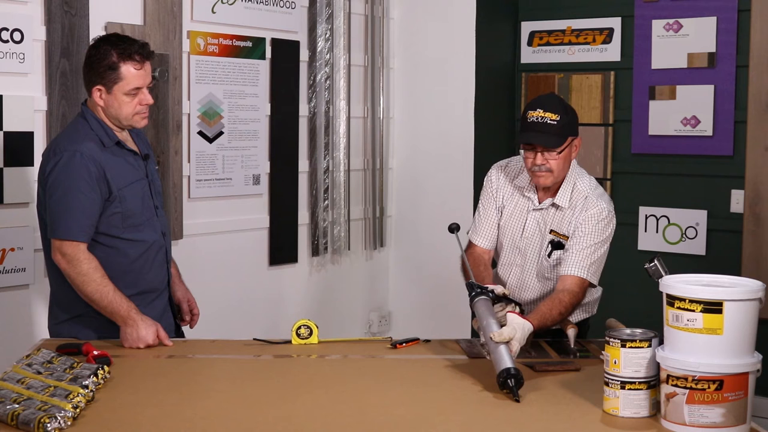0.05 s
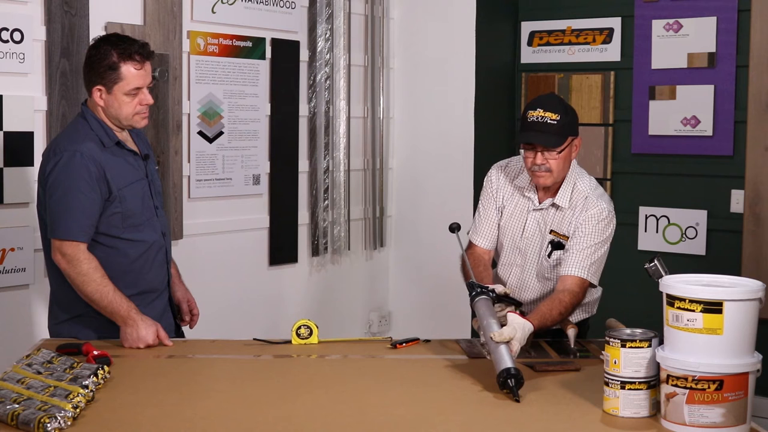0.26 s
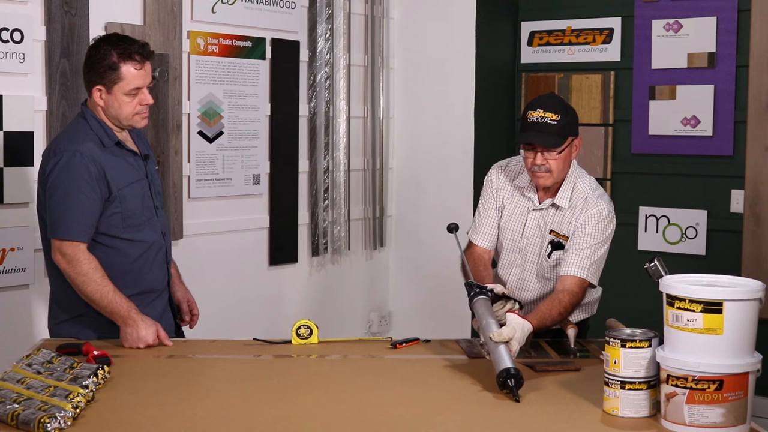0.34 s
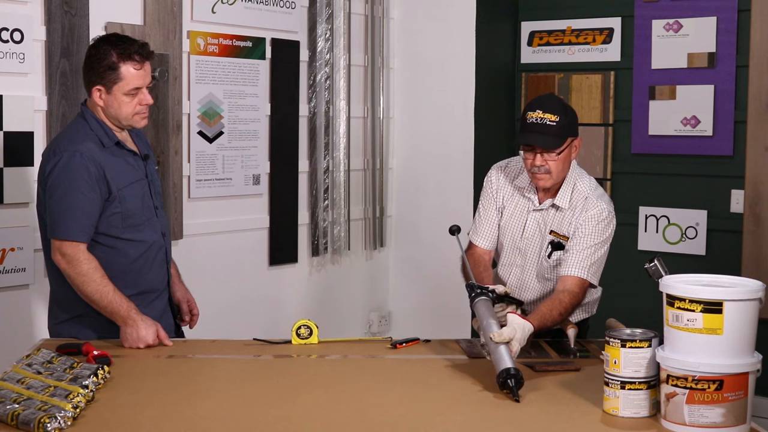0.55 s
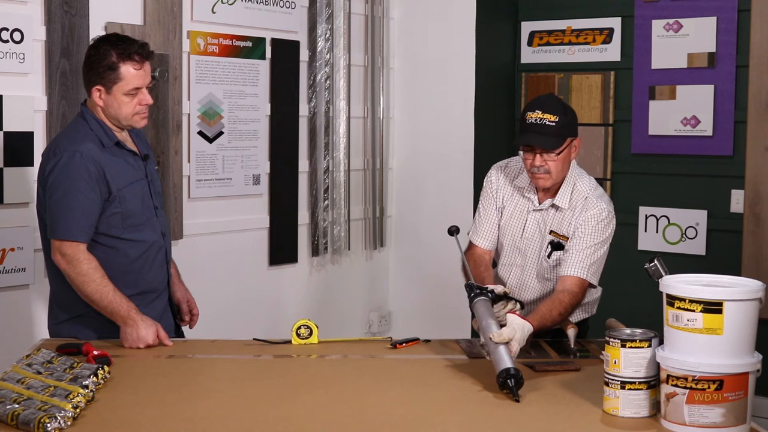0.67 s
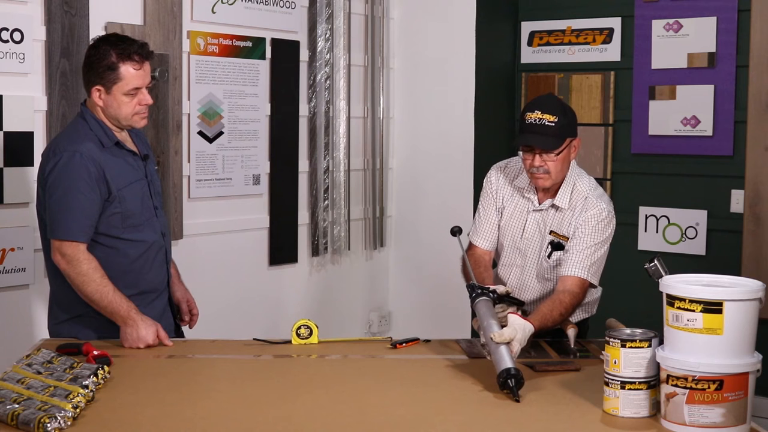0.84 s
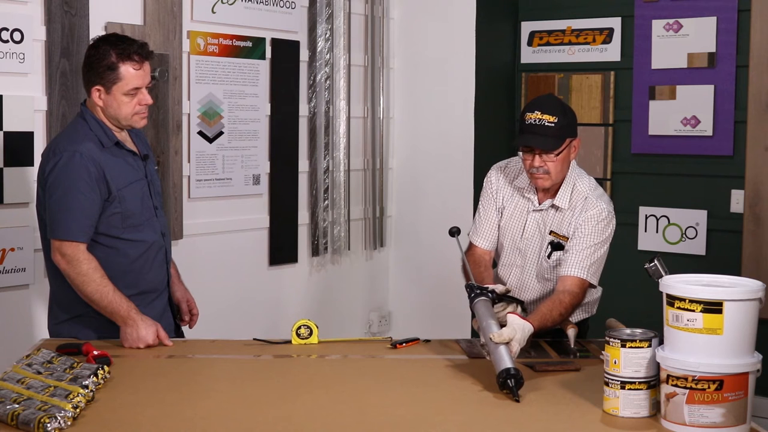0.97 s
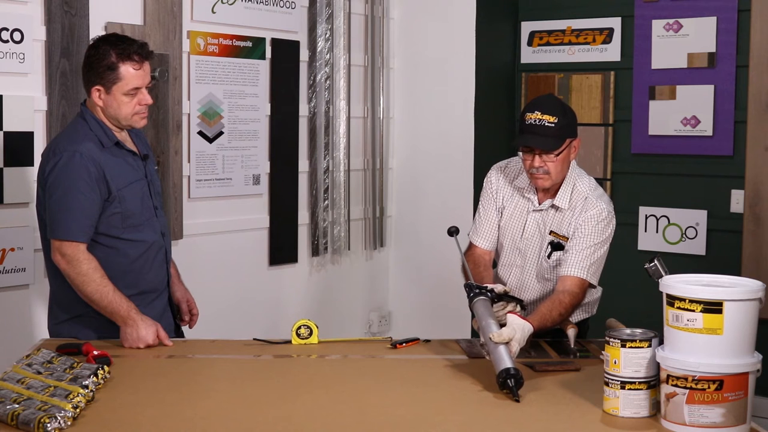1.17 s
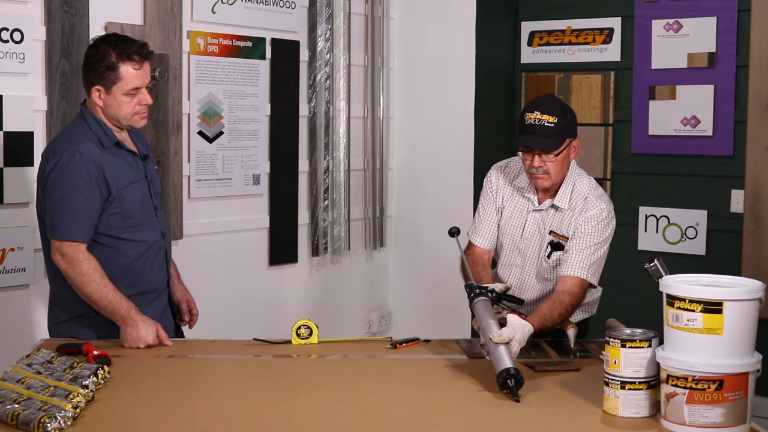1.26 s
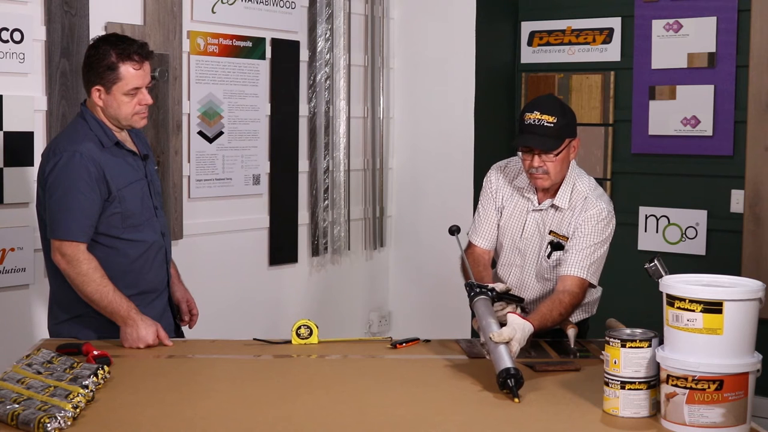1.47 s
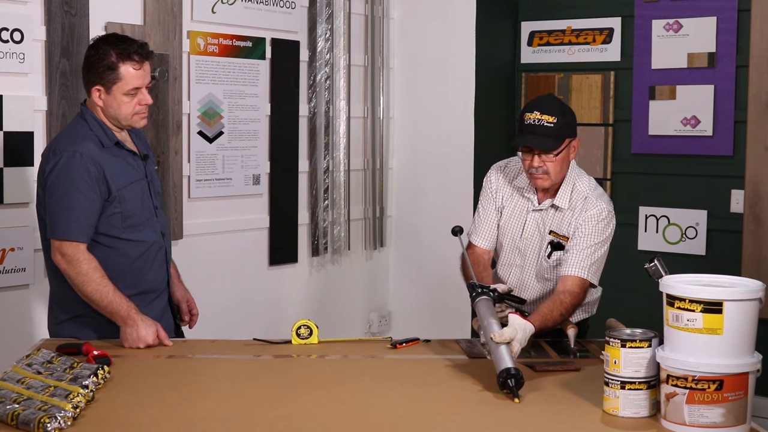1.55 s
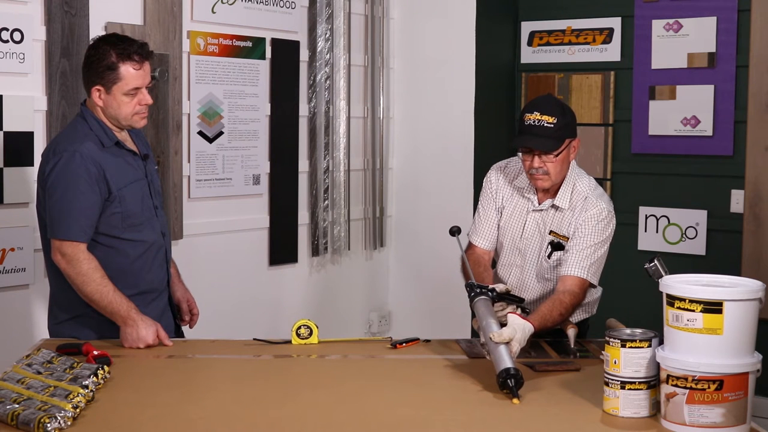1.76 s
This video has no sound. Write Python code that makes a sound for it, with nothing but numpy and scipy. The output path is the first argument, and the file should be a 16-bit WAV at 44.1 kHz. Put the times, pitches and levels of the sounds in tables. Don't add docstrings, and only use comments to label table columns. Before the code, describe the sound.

A metal caulking gun is pumped about six times in quick rhythm, each pull creaking and clacking, each release squeaking and scraping; one very loud snap, then a weaker one, in a reverberant room with faint ventilation rumble.

```python
import sys
import numpy as np
from scipy import signal
from scipy.fft import rfft, irfft
from scipy.io import wavfile

SR = 44100
rng = np.random.default_rng(int(sys.argv[2]) if len(sys.argv) > 2 else 0)


def attenuation_scalar(level_db):
    decades = np.asarray(level_db, float) / 20
    return 10 ** decades


def unload_wav(signal):
    wavfile.write(
        sys.argv[1],
        SR,
        np.round(np.clip(np.atleast_2d(signal).T, -1, 1) * 32767).astype(np.int16),
    )


N = 79380
T = np.arange(N) / SR
KNOCK_ECHO_SHARE = 0.2


def at_hz(points, hz):
    p = np.array(points)
    return np.interp(np.log(np.maximum(hz, 1)), np.log(p[:, 0]), p[:, 1])


def rms_one(x):
    return x / np.sqrt(np.mean(x ** 2) + 1e-20)


def colour(x, points):
    return irfft(rfft(x) * attenuation_scalar(at_hz(points, np.fft.rfftfreq(N, 1 / SR))), N)


def drift(rate_hz):
    r = np.exp(-2 * np.pi * rate_hz / SR)
    wander = signal.lfilter([1], [1, -2 * r, r * r], rng.standard_normal(N + SR))
    return rms_one(wander[SR:])


def ring(x, hz, t60_s):
    r = attenuation_scalar(-60 / (t60_s * SR))
    w = 2 * np.pi * hz / SR
    return signal.lfilter([0, np.sin(w)], [1, -2 * r * np.cos(w), r * r], x + 1e-18)


def peak(x, hz, width_hz):
    r = np.exp(-np.pi * width_hz / SR)
    feedback = [1, -2 * r * np.cos(2 * np.pi * hz / SR), r * r]
    return signal.lfilter([(1 - r * r) / 2, 0, (r * r - 1) / 2], feedback, x + 1e-18)


def swell(s, half):
    return np.cos(np.pi / 2 * np.clip((T - s) / half, -1, 1)) ** 2


def surge(s, half):
    return swell(s, half) * np.clip(1 + (T - s) / half, 0, 2)


def burst(s, tau):
    return (T >= s) * np.exp(-np.maximum(T - s, 0) / tau)


def thud(s, rise):
    x = np.maximum(T - s, 0) / rise
    return x * np.exp(1 - x)


def even(x):
    return rms_one(x / (np.abs(signal.hilbert(x)) + 0.3 * x.std()) ** 0.7)


def squeals():
    # centre_s, half_width_s, peak_db, pitch_hz
    squeal_table = [(0.060, 0.0094, -30, 3448), (0.076, 0.011, -31, 3451), (0.087, 0.0078, -43.5, 3590),
                    (.358, 0.0088, -25, 3439), (0.366, 0.0026, -31, 3485), (.37, 0.0034, -30.5, 3495),
                    (0.373, 0.002, -36, 3904), (.639, 0.011, -30, 3417), (.649, 0.007, -29.5, 3500),
                    (0.657, 0.0018, -43, 4144), (.922, 0.0085, -34, 3386), (.931, 0.0049, -33, 3437),
                    (0.936, 0.007, -44, 3484), (.942, 0.0031, -30.5, 3740), (1.169, 0.0087, -44.5, 3500),
                    (1.176, 0.0065, -34, 3445), (1.185, 0.004, -39.5, 3500), (1.196, 0.013, -39.5, 3530),
                    (1.212, .01, -52.5, 3593), (1.423, 0.0088, -52, 3438), (1.433, 0.0093, -36, 3500),
                    (1.442, 0.0055, -45, 3610), (1.454, 0.014, -50, 3575)]
    overtone_levels = [-24, -24, -32]
    swells = np.array([attenuation_scalar(db) * swell(s, half) for s, half, db, hz in squeal_table]) + 1e-12
    pitch = np.array(squeal_table)[:, 3] @ swells / swells.sum(axis=0)
    phase = 2 * np.pi * np.cumsum(pitch * (1 + 0.003 * drift(140))) / SR
    crests = sum(attenuation_scalar(db) * swell(s, half * 0.65) for s, half, db, hz in squeal_table)
    flutter_db = 4.0
    over = sum(attenuation_scalar(db + flutter_db * drift(138)) * np.sin((k + 2) * phase)
               for k, db in enumerate(overtone_levels))
    hiss = attenuation_scalar(-27) * peak(rng.standard_normal(N), 9000, 12000) * (1 + np.sin(phase))
    return sum(swells) * np.sin(phase) + crests * (over + hiss)


def creaks():
    # centre_s, half_width_s, peak_db, slip_rate_hz, upper_resonance_db
    creak_table = [
        (0.202, 0.007, -34, 698.8, -4.5),
        (.511, 0.0048, -32.5, 699.8, -6.5),
        (0.81, 0.0086, -32.5, 690, -2.5),
        (1.066, 0.0086, -32.5, 717.2, -6),
        (1.293, 0.013, -36, 738, 7.5),
        (1.300, 0.01, -34, 709, -39),
        (1.317, 0.018, -51.5, 703, -17),
        (1.550, 0.017, -40.5, 707, 3.5),
    ]
    # pitch_hz, width_hz, level_db
    weak_resonances = [(2840, 300, -18), (4290, 900, -19), (6400, 1500, -18)]
    sag_per_s, jitter, uneven_db = 9.0, 0.04, 3.0
    swells = np.array([attenuation_scalar(db) * swell(s, half) for s, half, db, hz, up_db in creak_table]) + 1e-12
    rates = [hz * (1 - sag_per_s * attenuation_scalar(db + 32) * np.clip(T - s, -half, half))
             for s, half, db, hz, up_db in creak_table]
    rate = np.sum(swells * rates, axis=0) / swells.sum(axis=0)
    turns = np.cumsum(rate * (1 + jitter * drift(300))) / SR
    clicks = np.diff(np.floor(turns), prepend=0)
    slips = clicks * attenuation_scalar(uneven_db * rng.standard_normal(N)) * SR / 1400
    slips = signal.lfilter(*signal.butter(2, 3500, fs=SR), slips)
    low = slips * sum(attenuation_scalar(db - max(up_db, 0)) * surge(s, half) for s, half, db, hz, up_db in creak_table)
    up = slips * sum(attenuation_scalar(db + min(up_db, 0)) * surge(s, half) for s, half, db, hz, up_db in creak_table)
    lower = peak(peak(low, 1410, 380), 1410, 380)
    upper = peak(peak(up, 2100, 480), 2100, 480)
    return lower - upper + sum(attenuation_scalar(db) * peak(low + up, hz, width) for hz, width, db in weak_resonances)


def knocks():
    # start_s, peak_db, own_ring_hz, own_ring_db, rise_s
    knock_table = [(0.2075, -25.5, 3780, -8, 0.00082), (0.211, -35.5, 6300, -11, .001),
                   (.218, -26, 3580, -14, 0.0022), (0.2239, -30.5, 2708, 0.5, 0.0012),
                   (.228, -40, 1100, -3.5, 0.0012), (0.2344, -33, 4000, -15, 0.0018),
                   (.238, -27, 2960, -27, 0.00062), (0.2876, -41, 3300, -8.5, 0.00099),
                   (0.5156, -23, 3560, -8.5, 0.00079), (0.5244, -24, 3630, -14, 0.0017),
                   (0.5269, -30, 2750, -3, 0.0015), (0.533, -33, 1020, -6, 0.00088),
                   (0.5424, -31, 2490, -10, 0.0015), (0.5829, -32.5, 3580, -14.5, 0.0019),
                   (0.5834, -41.5, 1080, 1.5, 0.0006), (0.8161, -22, 3590, -8.5, 0.00075),
                   (0.8244, -32.5, 2300, -6, .001), (.826, -31.5, 5840, -9, 0.001),
                   (.8293, -27, 2638, -9, 0.0012), (.8388, -30, 3950, -14, 0.0015),
                   (0.8408, -31.5, 3040, -9, 0.0018), (0.8645, -31.5, 3470, -13.5, 0.0012),
                   (0.8707, -41.5, 1013, -9.5, 0.0023), (1.049, -42, 2500, -4, 0.00052),
                   (1.0767, -25, 3618, -9.5, 0.00089), (1.3094, -27.5, 3670, -7, 0.00053),
                   (1.31, -37.5, 1075, -11, 0.0022), (1.319, -41.5, 3090, -2, 0.00079),
                   (1.342, -48, 1490, -3, 0.00092), (1.4394, -35, 1900, 2.5, 0.00031),
                   (1.4411, -34.5, 2290, -8.5, 0.00038), (1.5675, -32, 2340, -9.5, 0.00038),
                   (1.5699, -24, 3520, -12, 0.00044), (1.572, -38.5, 6300, -14, 0.00089),
                   (1.5797, -29.5, 2420, -11, 0.00065), (1.5826, -26.5, 2870, -16.5, 0.00088),
                   (1.5917, -35, 3500, -22, 0.0019), (1.5978, -35, 2480, -3.5, 0.00052),
                   (1.5995, -45, 2410, -15, 0.00099), (1.624, -40.5, 5490, -15.5, 0.0012)]
    # pitch_hz, width_hz, level_db
    frame_modes = [(694, 83, -5.5), (1150, 78, -22), (1296, 990, -9.5), (2410, 640, -11), (2750, 340, -1.5),
                   (4020, 1720, -5.5), (4780, 950, -6), (6300, 840, -10), (8280, 7100, -16),
                   (10860, 2600, -26.5), (13000, 3100, -33)]
    noise = rng.standard_normal(N)
    own_rings, buzz = np.zeros(N), np.zeros(N)
    for s, db, hz, own_db, rise in knock_table:
        shape = thud(s, rise)
        buzz += attenuation_scalar(db) * shape
        own_rings += attenuation_scalar(db + own_db) * shape * np.sin(2 * np.pi * hz * (T - s))
    frame = sum((-1) ** k * attenuation_scalar(db) * peak(buzz * noise, hz, width)
                for k, (hz, width, db) in enumerate(frame_modes))
    return own_rings + attenuation_scalar(1.5) * signal.lfilter(*signal.butter(2, 11000, fs=SR), frame)


def snaps():
    # start_s, peak_db
    snap_table = [
        (.6708, -2.5),
        (.9677, -19),
    ]
    # pitch_hz, first_snap_db, second_snap_db, t60_s
    barrel_modes = [(641, -21.5, -11.5, 0.022), (967, -26, -23, 0.024), (1563, -6.5, 0.5, 0.018),
                    (1920, -5, -33, 0.0081), (2500, -0.5, -39, 0.0052), (3033, -1.5, 5, 0.0086),
                    (3500, -2.5, 1.5, 0.016), (3890, -3, -7.5, 0.01), (4560, -13.5, -11.5, 0.018),
                    (5300, -10.5, -11, 0.0078), (5950, -16, -16.5, 0.016), (7600, -14, -13, 0.017),
                    (8580, -25, -19.5, 0.011), (10400, -9, -17, 0.0044)]
    modes, crack = np.zeros(N), np.zeros(N)
    for k, (s, db) in enumerate(snap_table):
        click = attenuation_scalar(db - 4) * (np.arange(N) == int(s * SR))
        modes += sum((-1) ** j * attenuation_scalar(mode[1 + k]) * ring(click, mode[0], mode[3])
                     for j, mode in enumerate(barrel_modes))
        crack_noise = peak(peak(rng.standard_normal(N), 2800, 2800), 3100, 6400)
        crack += attenuation_scalar(db - 10) * burst(s, 0.0026) * crack_noise
    return modes, crack


def scrapes():
    # centre_s, half_width_s, rms_db, rattle_hz, rattle_db
    scrape_table = [(0.033, 0.064, -59, 2067, 7.5), (0.042, 0.021, -54.5, 10900, -13),
                    (0.205, 0.0096, -44, 3950, -12), (0.317, 0.008, -57.5, 4300, -13.5),
                    (0.329, 0.012, -49.5, 1150, 1.5), (0.342, 0.023, -49, 1690, 3),
                    (.485, 0.022, -67.5, 2470, 7), (0.513, 0.013, -39, 2091, -3),
                    (0.539, .008, -39.5, 6350, -13), (0.619, 0.015, -50.5, 2100, 4.5),
                    (0.624, 0.0062, -51.5, 1100, 4.5), (0.639, 0.0087, -41.5, 1080, 3),
                    (.637, 0.015, -44.5, 1714, 3), (0.651, 0.01, -42, 1740, 5), (.639, 0.012, -44, 2880, 2),
                    (.647, 0.0077, -50.5, 334, 0.5), (1.076, 0.0058, -52, 1080, 9.5),
                    (0.811, 0.0064, -39, 9225, -9), (0.848, 0.0042, -53, 7800, -6.5),
                    (0.923, 0.024, -54, 10400, -1.5), (.943, 0.0053, -49.5, 7600, -2),
                    (1.070, 0.014, -47, 3500, -1), (1.156, 0.017, -53.5, 1700, 1),
                    (1.305, 0.0096, -52, 6300, -1), (1.331, 0.0057, -59, 3080, 10),
                    (1.417, 0.015, -52.5, 1682, -2.5), (1.459, 0.0056, -60, 1984, 9),
                    (1.553, 0.02, -62, 4840, -13)]
    # pitch_hz, level_db per Hz
    grit_colour = [(300, 2.5), (1500, -7.5), (3500, -3.5), (7500, -12), (10500, -12), (13000, -16.5),
                   (16000, -21)]
    grains_per_s, spread_db, patchy_db = 12000, 3.0, 3.5
    sizes = attenuation_scalar(spread_db * np.minimum(rng.exponential(1, N), 3.5))
    grains = (rng.random(N) < grains_per_s / SR) * sizes * rng.choice([-1, 1], N)
    patches = sum(attenuation_scalar(patchy_db * drift(90)) * peak(np.roll(grains, 997 * k), hz, hz / 3)
                  for k, hz in enumerate(np.geomspace(400, 15000, 14)))
    grit = rms_one(colour(patches, grit_colour))
    out = np.zeros(N)
    for s, half, db, hz, rattle_db in scrape_table:
        rattle = attenuation_scalar(rattle_db) * even(peak(grains, hz, 80))
        out += attenuation_scalar(db) * swell(s, half) * (grit + rattle)
    return out


def ticks():
    # start_s, peak_db
    tick_table = [
        (0.0307, -41),
        (0.3266, -44.5),
        (0.337, -39),
        (1.1023, -29.5),
        (1.1057, -40),
        (1.3453, -30),
        (1.3479, -41.5),
    ]
    # pitch_hz, level_db per Hz
    tick_spectrum = [(500, 5.5), (1200, 0), (3300, 0.5), (8500, -1), (11500, -12.5), (13000, -19),
                     (16000, -26.5)]
    noise = rms_one(colour(rng.standard_normal(N), tick_spectrum))
    return noise * sum(attenuation_scalar(db - 10) * thud(s, 0.001) for s, db in tick_table)


def bench(x):
    # delay_s, level_db
    echo_table = [(.0010, -0.5), (.0019, -0.5), (.0034, -12.5), (.0060, -14.5)]
    return x + sum(attenuation_scalar(db) * np.interp(T - s, T, x, left=0) for s, db in echo_table)


def room(x):
    # pitch_hz, t60_s
    fall_times = [(300, 0.98), (1000, 1), (3000, 0.87), (6000, 0.56), (12000, 0.55)]
    # pitch_hz, level_db
    tail_colour = [(300, -1), (1000, -2), (3000, -8), (6000, -2.5), (12000, -3.5), (15500, -2)]
    t, tail = T[:SR], 0
    edges = 100 * 2 ** np.arange(0, 7.6, 0.5)
    for low, high in zip(edges, edges[1:]):
        hz = np.sqrt(low * high)
        band_filter = signal.butter(2, [low, high], "band", fs=SR, output="sos")
        band = signal.sosfilt(band_filter, rng.standard_normal(SR))
        tail = tail + band * attenuation_scalar(at_hz(tail_colour, hz) - 60 * t / at_hz(fall_times, hz))
    first_wall_s = 0.016
    early = attenuation_scalar(4.5) * (t > 0.004)
    late = 1 + attenuation_scalar(6.5) * burst(first_wall_s, 0.013)[:SR]
    shape = np.where(t < first_wall_s, early, late)
    return attenuation_scalar(-7.5 - 38.5) * signal.fftconvolve(x, tail * shape)[:N]


def floor():
    # pitch_hz, level_db per Hz
    air_colour = [(22, -29), (50, -3.5), (170, 4), (280, -1), (700, -8.5), (1500, -14.5), (4000, -23),
                  (14500, -38.5), (16000, -46.5)]
    # time_s, pitch_hz, rms_db
    motor_course = [
        (0, 274, -62.5),
        (0.2, 268, -67),
        (0.326, 222, -67.5),
        (0.699, 238, -57),
        (0.951, 256, -62),
        (1.102, 260, -82),
        (1.247, 266, -58.5),
        (1.499, 279, -62.5),
        (1.8, 280, -80),
    ]
    air = rms_one(colour(rng.standard_normal(N), air_colour)) * attenuation_scalar(-56 + 0.6 * drift(5.1))
    s, hz, db = np.transpose(motor_course)
    phase = 2 * np.pi * np.cumsum(np.interp(T, s, hz) + 1.38 * drift(4.8)) / SR
    motor_level = np.sqrt(2) * attenuation_scalar(np.interp(T, s, db) + 2.0 * drift(25.0))
    return air + motor_level * (np.sin(phase) + attenuation_scalar(-14) * np.sin(3 * phase))


def scene():
    squeal = squeals()
    rub = creaks() + scrapes()
    hits = knocks() + ticks()
    modes, crack = snaps()
    to_room = attenuation_scalar(-3) * squeal + rub + 2 * hits + attenuation_scalar(-5) * modes + attenuation_scalar(14.5) * crack
    on_bench = bench(KNOCK_ECHO_SHARE * hits + modes + crack)
    direct_hits = (1 - KNOCK_ECHO_SHARE) * 2 * hits
    gun = squeal + rub + on_bench + direct_hits + room(to_room)
    low_cut = signal.butter(2, 300, "high", fs=SR, output="sos")
    return (signal.sosfilt(low_cut, gun) + floor())[None, :]


def band_limit(x):
    return signal.sosfilt(signal.butter(12, 16450, fs=SR, output="sos"), x)


def record(dry):
    overload = 0.85
    rounded = overload * np.tanh(dry / overload)
    top_cut = signal.cheby2(12, 60, 16300, fs=SR, output="sos")
    mix = signal.sosfilt(top_cut, rounded)
    return band_limit(mix)


dry = scene()
out = record(dry)
unload_wav(out)
```